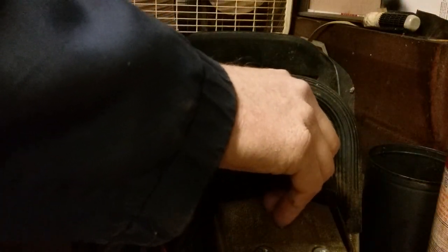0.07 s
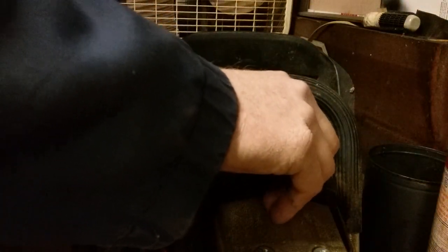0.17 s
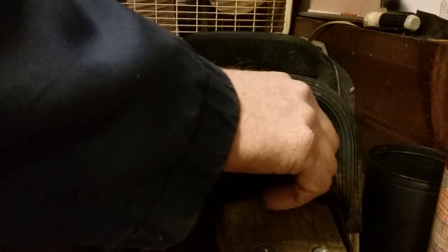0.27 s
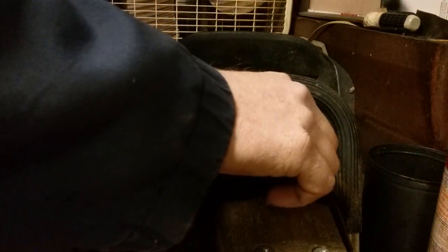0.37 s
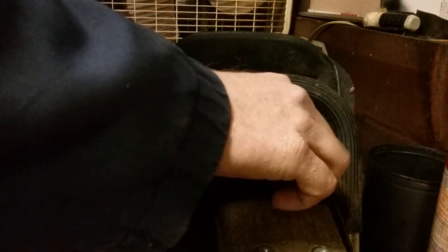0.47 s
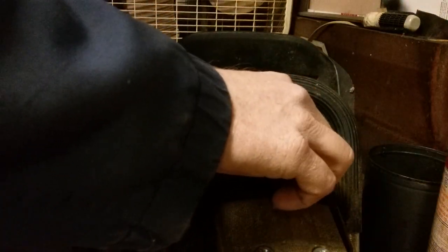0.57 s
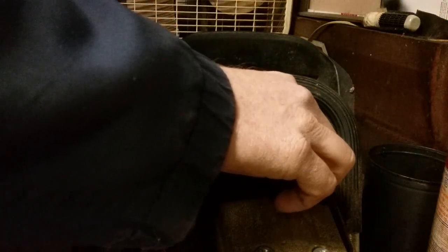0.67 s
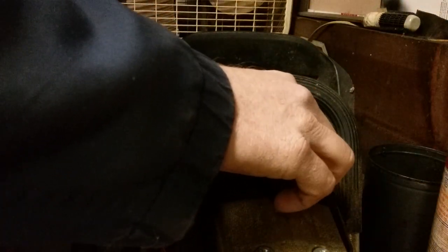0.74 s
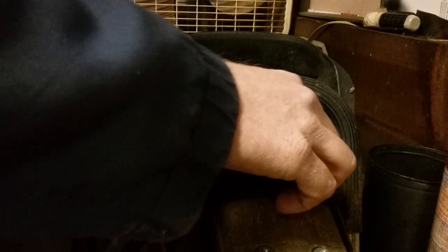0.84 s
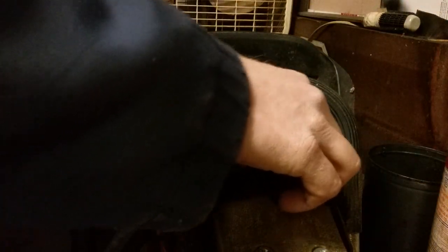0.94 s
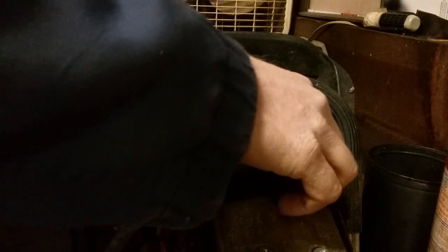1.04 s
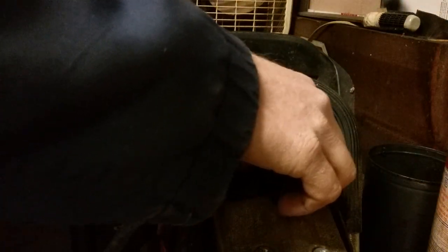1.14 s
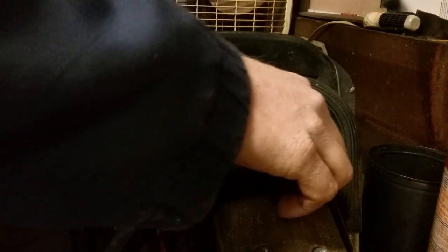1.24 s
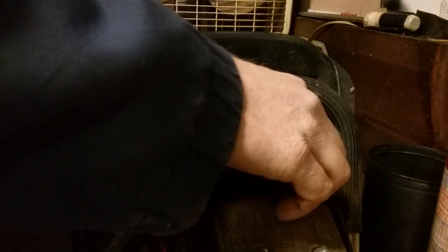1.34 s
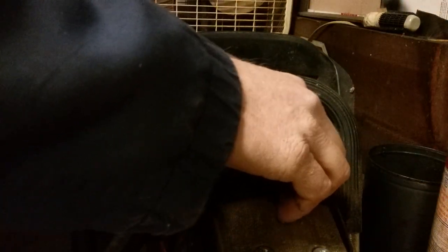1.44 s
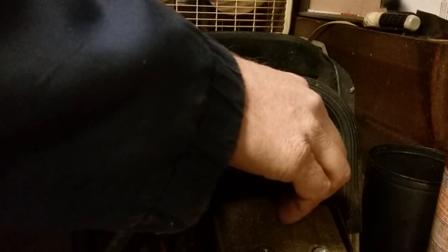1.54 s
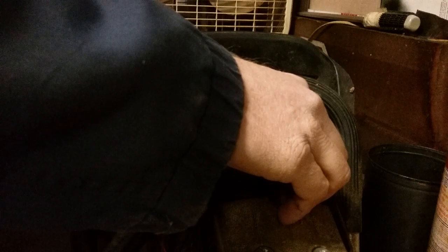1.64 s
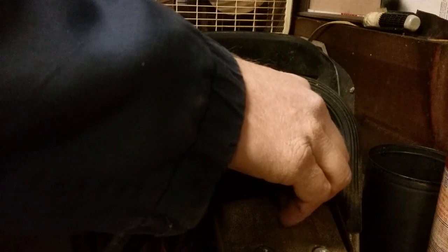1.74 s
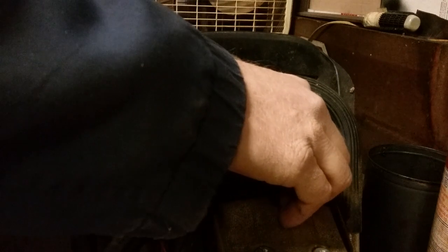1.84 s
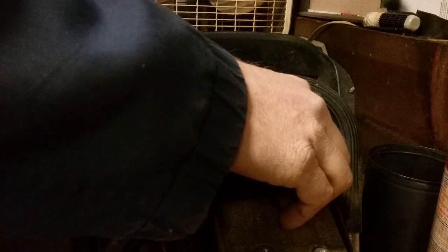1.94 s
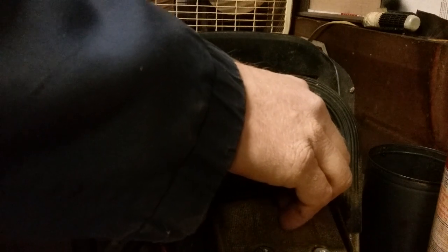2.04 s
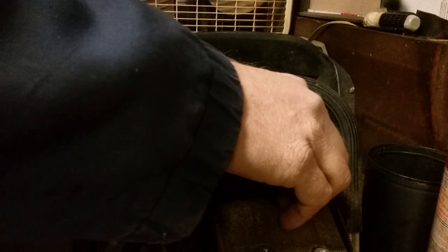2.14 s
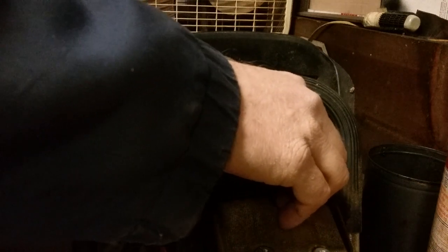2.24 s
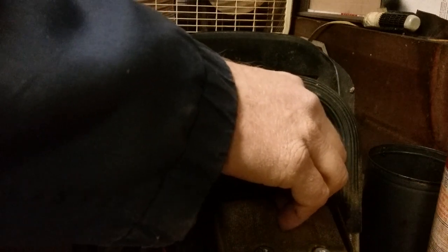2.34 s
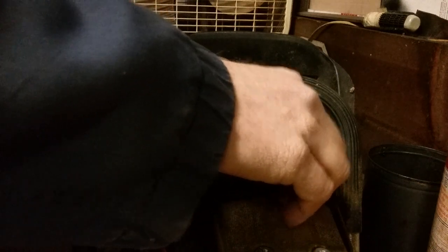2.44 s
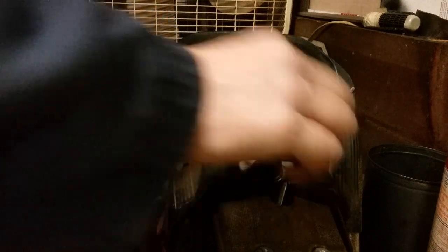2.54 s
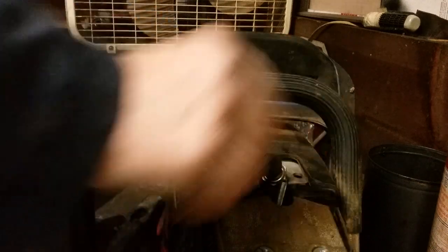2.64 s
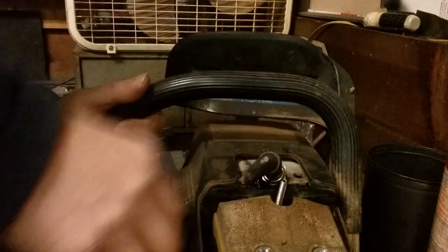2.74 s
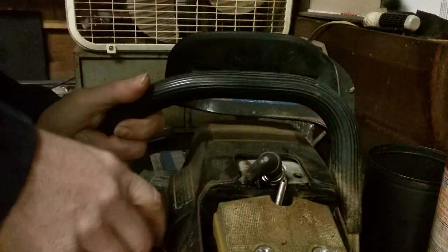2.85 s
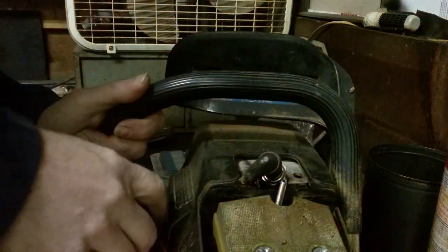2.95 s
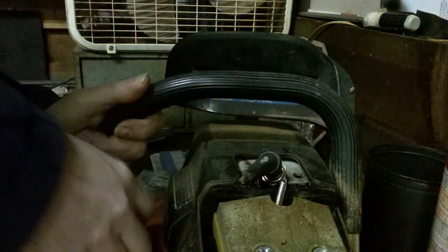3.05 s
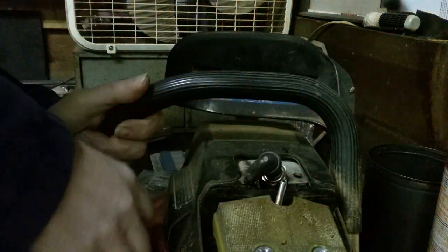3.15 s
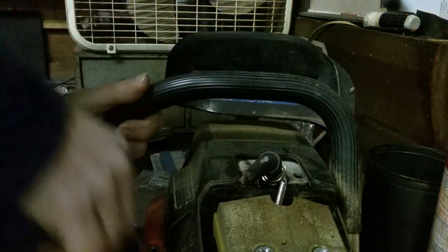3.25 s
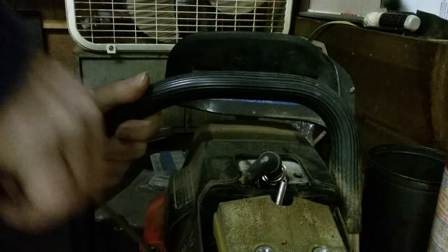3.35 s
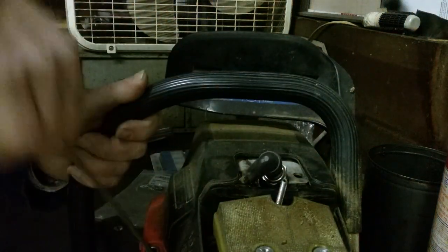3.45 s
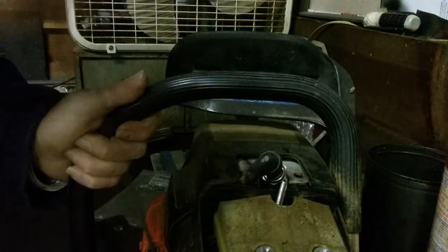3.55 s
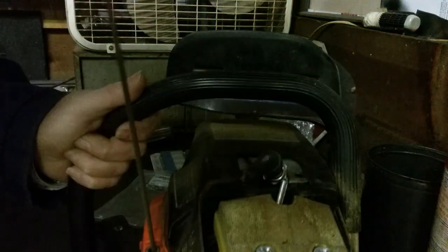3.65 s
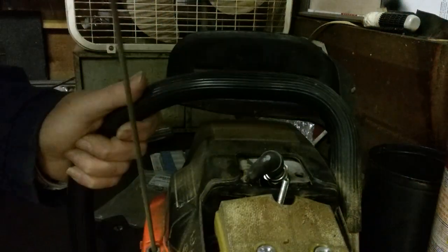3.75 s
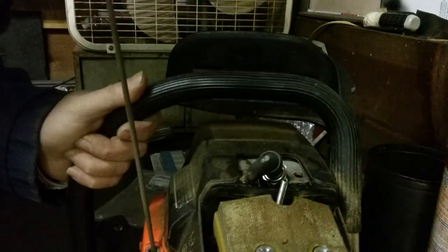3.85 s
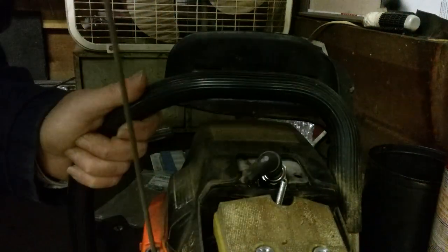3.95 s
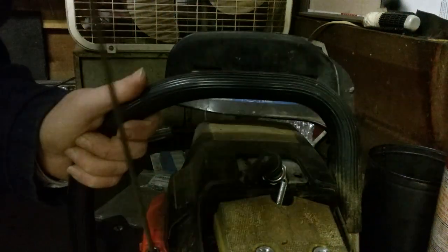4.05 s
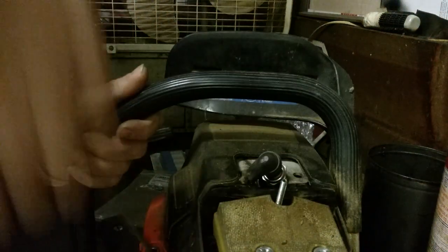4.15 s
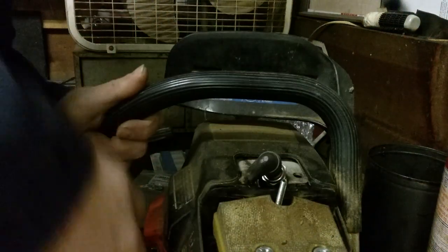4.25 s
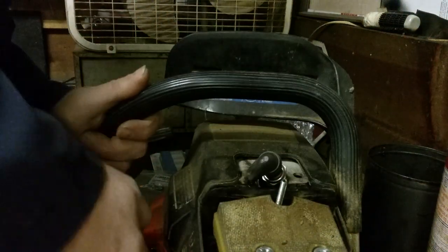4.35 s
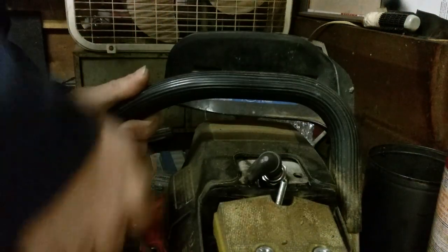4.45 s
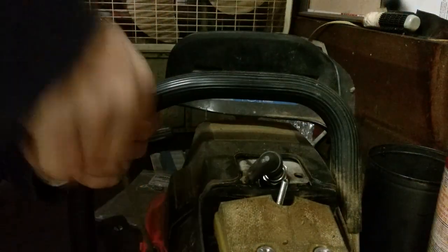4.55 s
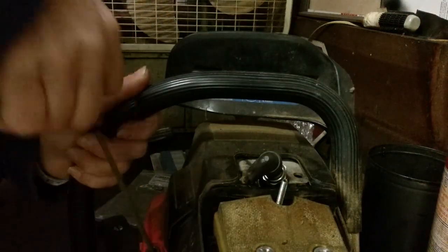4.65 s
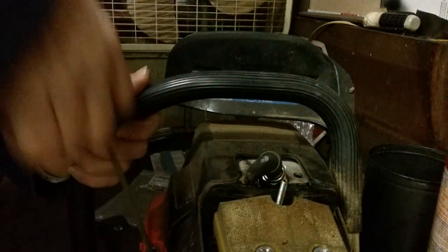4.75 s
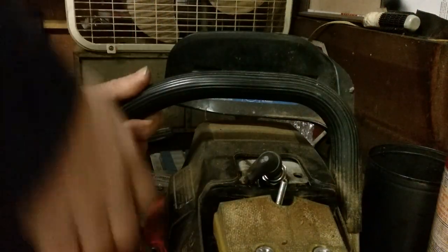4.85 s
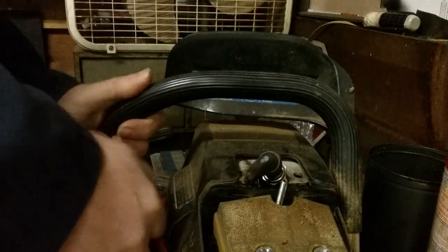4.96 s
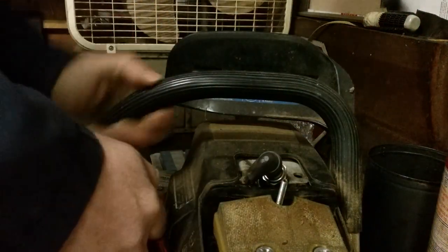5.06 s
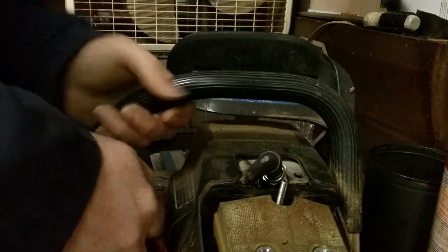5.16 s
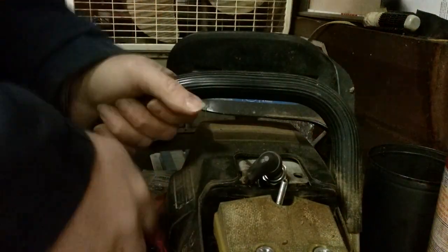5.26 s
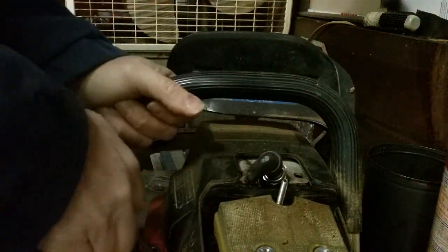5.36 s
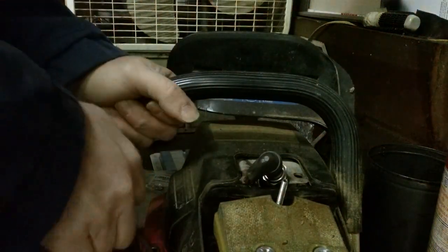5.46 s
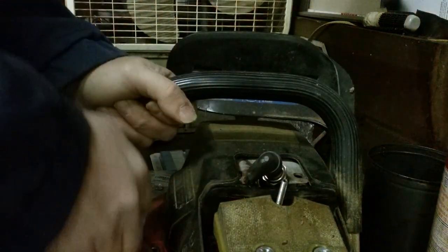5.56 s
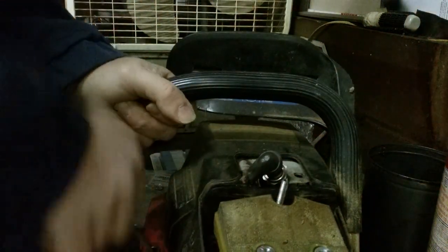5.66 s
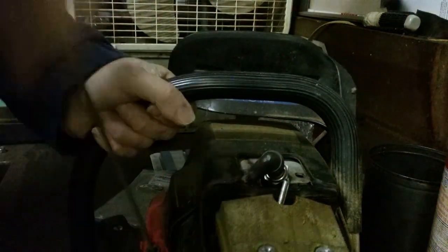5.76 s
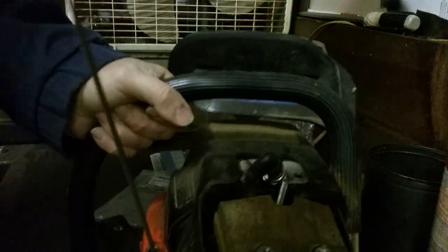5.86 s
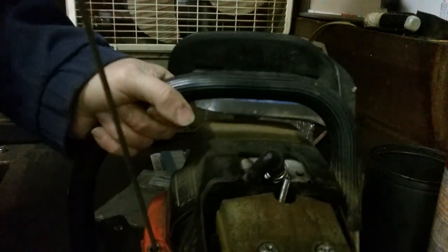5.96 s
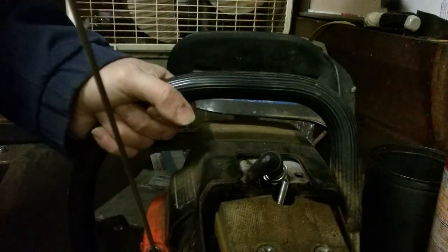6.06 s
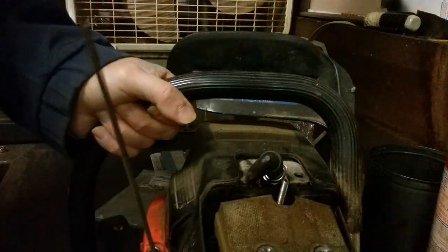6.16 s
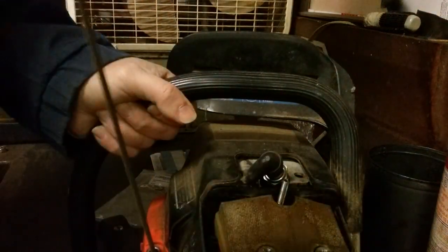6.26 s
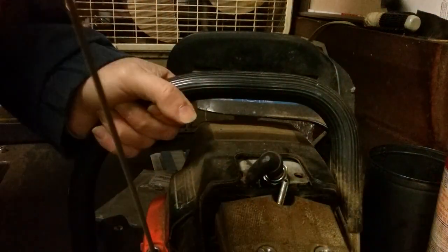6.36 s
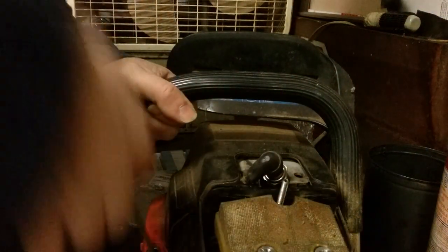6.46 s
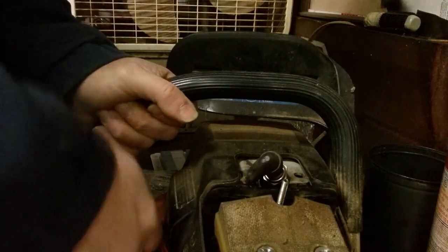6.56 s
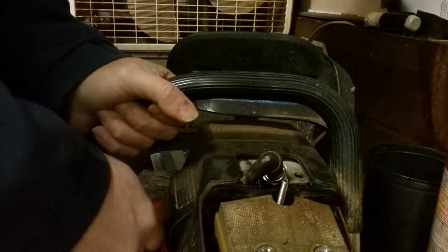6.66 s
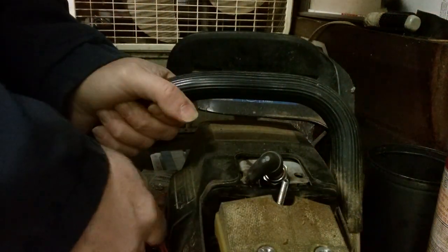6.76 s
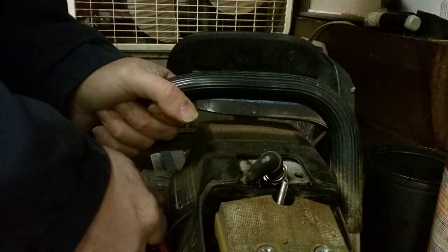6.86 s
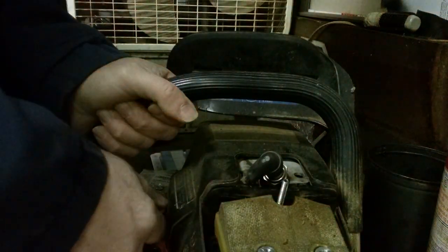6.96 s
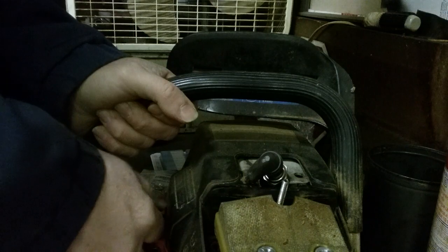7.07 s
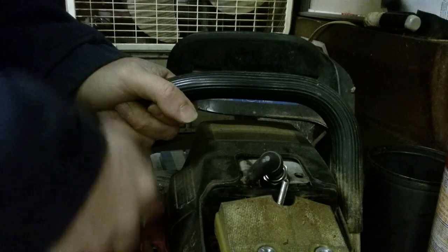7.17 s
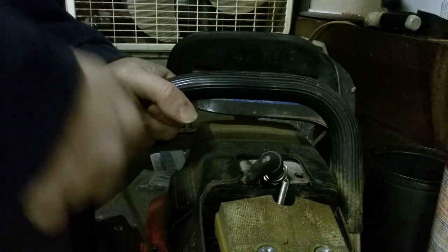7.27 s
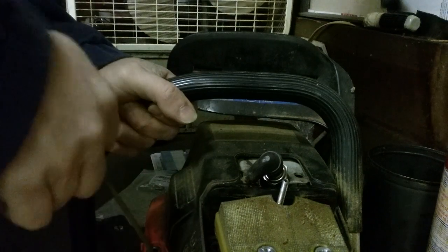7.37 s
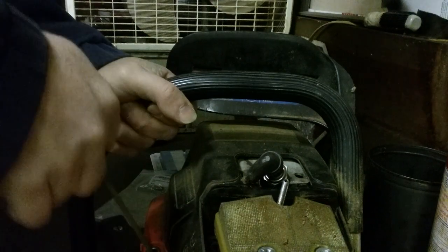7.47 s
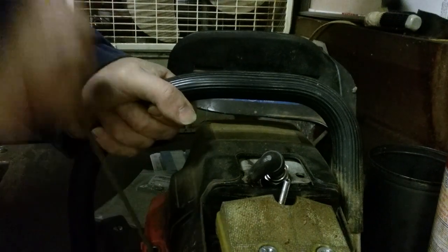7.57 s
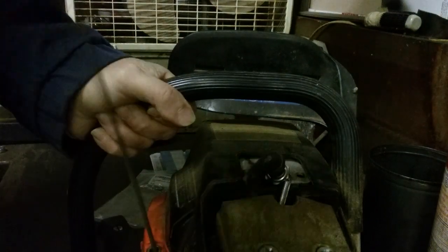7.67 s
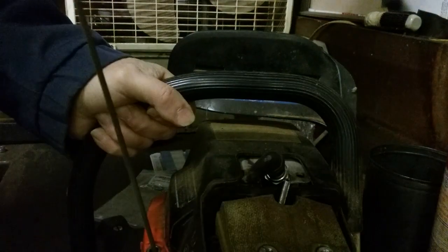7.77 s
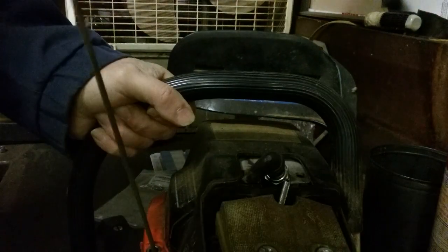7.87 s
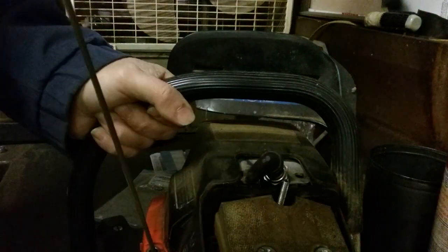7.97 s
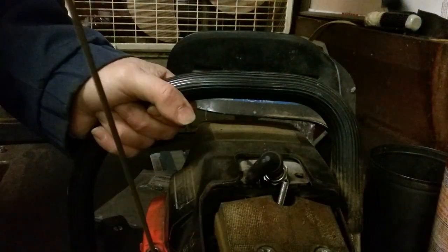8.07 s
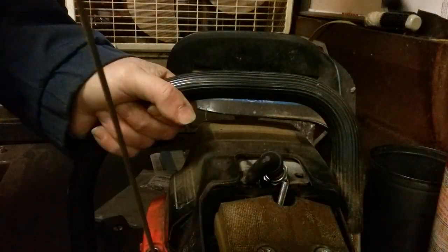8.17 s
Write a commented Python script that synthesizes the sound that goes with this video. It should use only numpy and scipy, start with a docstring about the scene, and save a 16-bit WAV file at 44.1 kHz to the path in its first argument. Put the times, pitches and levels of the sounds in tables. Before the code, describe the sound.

Faint creaks and taps come from a hand on a chainsaw. Then the starter rope is pulled three times, about two seconds apart. Each pull rasps and whirrs while the engine turns over with quick, low puffs of air, never firing. The rope winds back with a metallic rattle and ring, and the grip knocks against the housing between pulls. The microphone is close, in a small, quiet workshop.

```python
"""Faint creaks and taps of a hand on a chainsaw, close to the microphone in a small workshop; then three
pulls on its recoil starter, and the engine never fires. The pawls snap in, the rope whirrs out and the
turning crank gulps air and puffs it through the muffler. After each pull the spring winds the rope back,
the pulley rattling and ringing; between pulls the grip knocks home."""
import sys
import numpy as np
from scipy import signal
from scipy.fft import rfft, irfft, next_fast_len
from scipy.io import wavfile
from scipy.ndimage import uniform_filter1d

SR = 44100
rng = np.random.default_rng(int(sys.argv[2]) if len(sys.argv) > 2 else 0)


def pcm_store(signal):
    """Save signal as 16-bit PCM."""
    levels = np.round(np.clip(np.atleast_2d(signal), -1, 1) * 32767)
    wavfile.write(sys.argv[1], SR, levels.astype(np.int16).T)


N = 362426
TIME = np.arange(N) / SR
SHORT = TIME[:SR // 2]  # time axis of a single event

# a puff for each compression the piston gets over, one list a pull: (time [s], level [dB])
PUFFS_BY_PULL = [
    [(3.631, -5.5), (3.77, 0.5), (3.8735, -1)],
    [(5.8159, -5.5), (5.9116, -2.5), (5.9775, 1), (6.0426, 3), (6.1445, -8.5)],
    [(7.702, -18.5), (7.7657, 0.5), (7.8358, 0.5), (7.9057, 3), (8.0012, -3.5)],
]
# rope running over pulley and eyelet, one list a pull: (time [s], level [dB])
ROPE_RUNS = [
    [(3.5, -47.5), (3.586, -51.5), (3.61, -31.5), (3.84, -18.5), (4.016, -54), (4.03, -36)],
    [(5.79, -39), (5.846, -21.5), (5.97, -18), (6.134, -30), (6.162, -79), (6.2, -43)],
    [(7.63, -45), (7.776, -18.5), (7.99, -29), (8.002, -66), (8.134, -43), (8.15, -40.5)],
]
# the spring winds the rope back:
# (start [s], fastest at [s], time from there to half speed [s], end of chatter [s], level [dB])
SPRING_RETURNS = [(4.046, 4.119, 0.16, 4.29, -13.5), (6.215, 6.326, .21, 6.56, -15),
                  (8.163, 8.23, 0.19, 8.4, -19)]
# metal modes of the pulley and its spring: (frequency [Hz], level [dB])
PULLEY_MODES = [(3257, 5.5), (3311, -7.5), (3811, -14), (4027, -1), (4517, -4), (5663, -3), (5975, -8),
                (6449, -10), (6643, -11.5), (6740, -12), (7560, -15.5), (7989, -21.5), (10244, -14),
                (12602, -23), (13211, -19), (14110, -22.5)]
# resonances of the starter housing: (frequency [Hz], width [Hz], lift [dB])
HOUSING_PEAKS = [(513, 31, 11), (603.6, 70, 12), (936, 87, 8.5), (1222, 69, 5.5), (1472, 33, 5.5),
                 (1644, 34, 6), (2140, 60, 0), (4180, 310, 3.5)]


def undb(db):
    """Decibels to gain."""
    return 10 ** (np.asarray(db) / 20)


def unit(x):
    """Scale to rms 1."""
    return x / np.sqrt(np.mean(x ** 2))


def add(track, s, sound):
    """Mix a sound into a track from time s."""
    i = int(np.clip(s * SR, 0, N - 1))
    track[i:i + len(sound)] += sound[:N - i]


def follow(stretches, fade_s=.023):
    """Gain along stretches of (time [s], level [dB]), fading quickly outside each."""
    gain = np.zeros(N)
    for stretch in stretches:
        times, db = np.transpose(stretch)
        outside_s = np.maximum(times[0] - TIME, TIME - times[-1]).clip(0)
        gain = np.maximum(gain, undb(np.interp(TIME, times, db)) * (1 - outside_s / fade_s).clip(0))
    return gain


def response(colour, peaks=(), size=4096):
    """Causal impulse response of a colour (Hz, dB) with resonances (Hz, width Hz, lift dB) on top."""
    f = np.arange(size // 2 + 1) * SR / size + 1
    hz, db = np.transpose(colour)
    curve = np.interp(np.log(f), np.log(hz), db) - 12 * np.log2(hz[0] / f).clip(0)
    curve += sum(lift / (1 + (2 * (f - centre) / width) ** 2) for centre, width, lift in peaks)
    cepstrum = irfft(np.log(undb(curve)))
    cepstrum[1:size // 2] *= 2
    return irfft(np.exp(rfft(cepstrum[:size // 2], size)))


def through(x, impulse):
    """Convolve along time, keeping the power of white noise."""
    kernel = impulse / np.linalg.norm(impulse)
    return signal.oaconvolve(np.atleast_2d(x), kernel[None], axes=1)[:, :N]


def modes(table, t, phase=0):
    """Damped modes (frequency [Hz], level [dB], t60 [s]) struck at t = 0."""
    return sum(undb(db) * np.cos(2 * np.pi * hz * t - phase) * np.exp(-np.log(1000) * t.clip(0) / t60)
               for hz, db, t60 in table)


def wander(seconds):
    """Smooth random drift of rms 1 that changes within the given time."""
    size = int(seconds * SR)
    return unit(uniform_filter1d(uniform_filter1d(rng.standard_normal(N), size), size))


def blows(rows, rise_s):
    """Force envelope of blows (time [s], level [dB], decay [s])."""
    force = np.zeros(N)
    for s, db, decay in rows:
        add(force, s, undb(db) * (1 - np.exp(-SHORT / rise_s)) * np.exp(-SHORT / decay))
    return force


def mic_pair(x, lag_samples=6):
    """The starter is nearer the left microphone: the right hears it a little later."""
    return np.array([x, np.concatenate([np.zeros(lag_samples), x[:-lag_samples]])])


def grit(spread_db, likeness=.23, grain_samples=24):
    """Dense tiny contacts of unequal strength all over the casing, partly alike at the two microphones."""
    strength = undb(spread_db * rng.standard_normal(N // grain_samples + 1).clip(-2, 2))
    common = np.sqrt(likeness) * mic_pair(rng.standard_normal(N))
    separate = np.sqrt(1 - likeness) * rng.standard_normal((2, N))
    return unit((common + separate) * np.repeat(strength, grain_samples)[:N])


def room_tone():
    """Still workshop air with a faint steady hum."""
    # spectrum of the air and partials of the hum: (frequency [Hz], level [dB])
    air_colour = [(25, -29.5), (60, -10), (125, -9), (240, -15.5), (400, -21), (500, -19), (900, -17),
                  (1650, -19), (4000, -26), (16000, -31)]
    hum_partials = [(118.4, -79.5), (479.1, -87), (597.5, -89), (1152, -91), (1680, -87)]
    noise = .75 * rng.standard_normal(N) + 1.56 * rng.standard_normal((2, N))
    hum = sum(np.sqrt(2) * undb(db) * np.sin(2 * np.pi * hz * TIME) for hz, db in hum_partials)
    return undb(-71.5) * through(noise, response(air_colour)) + hum


def reflections(t60_s, onset_s):
    """A dense train of echoes with unit energy."""
    train = rng.standard_normal(len(SHORT)) * (1 - np.exp(-SHORT / onset_s))
    train *= np.exp(-np.log(1000) * SHORT / t60_s)
    return train / np.linalg.norm(train)


def workshop(mechanism, bass):
    """Near walls return a short tail; both microphones get the bass, the right is shaded from the top."""
    # spectra of the wall echo and of the shading: (frequency [Hz], level [dB])
    wall_colour = [(60, -11.5), (150, -10), (400, -6), (1000, -8.5), (4000, -11.5), (8000, -12),
                   (15000, -13.5)]
    shade = [(10, -3), (450, -2.5), (1000, -.5), (2400, 1.5), (4200, 1), (5500, -8), (7000, -2),
             (15000, -3.5)]
    left = mechanism[0]
    right = signal.oaconvolve(mechanism[1], response(shade, size=512))[:N]
    boom = bass + undb(-10) * through(bass, reflections(t60_s=.36, onset_s=.009))[0]
    channels = []
    for direct, bass_db in ((left, -.4), (right, .4)):
        walls = signal.fftconvolve(reflections(t60_s=.3, onset_s=.0089), response(wall_colour))
        tail = signal.oaconvolve(direct + undb(-12.5) * bass, walls[:len(SHORT)])[:N]
        channels.append(direct + undb(bass_db) * boom + tail)
    return np.array(channels)


def handling(step_s=.053, jitter_s=.0032, fade_db_per_s=19):
    """The hand taps the hollow casing, and the handle creaks in fading stick-slip steps."""
    # taps on the casing: (time [s], level [dB])
    taps = [(0.107, -49), (1.122, -54), (1.868, -55), (2.158, -26.5), (5.624, -48.5), (7.011, -49)]
    # creaks under the grip: (start [s], end [s], level [dB])
    creaks = [(0.289, .56, -47), (2.831, 2.95, -52)]
    # spectra of casing and handle: (frequency [Hz], level [dB])
    tap_colour = [(100, -40), (290, -16), (750, -10.5), (1100, -1), (1500, -9.5), (2240, -3.5),
                  (3100, -16.5), (4400, -16), (5400, -36.5), (14000, -48)]
    creak_colour = [(90, -8), (300, .5), (1200, -.5), (4400, -6), (6000, -30)]
    contact = grit(spread_db=3, likeness=.43)
    tap_force = blows([(s, db, .009) for s, db in taps], rise_s=.0058)
    hollow = through(contact * tap_force, response(tap_colour, [(1104, 280, 4.4)]))
    steps = [(s + jitter_s * rng.standard_normal(), db - fade_db_per_s * (s - start), .012)
             for start, end, db in creaks for s in np.arange(start, end, step_s)]
    creak = through(contact * blows(steps, rise_s=.0029), response(creak_colour))
    return undb(5) * hollow + creak


def puffs():
    """The puffs of all pulls in one list: (time [s], level [dB])."""
    return [row for pull in PUFFS_BY_PULL for row in pull]


def gulps(first_share=.52, last_share=.34):
    """The intake opens between puffs, earlier in each turn of a pull: (time [s], puff level [dB])."""
    events = []
    for pull in PUFFS_BY_PULL:
        shares = np.linspace(first_share, last_share, len(pull) - 1)
        for (s, db), (next_s, _), share in zip(pull, pull[1:], shares):
            events.append((s + share * (next_s - s), db))
    return events


def pulley_ring(db_per_octave, t60_s=.098):
    """The pulley's answer to a blow; softer contact tilts its spectrum down."""
    lowest_hz = PULLEY_MODES[0][0]
    tilted = [(hz, db + db_per_octave * np.log2(hz / lowest_hz), t60_s) for hz, db in PULLEY_MODES]
    return modes(tilted, SHORT)


def ticks(pawl_lead_s=.02):
    """The loaded pawls ping before each puff, each gulp clicks, and slipping coils jingle the pulley."""
    # coils of rope slip on the pulley: (time [s], level [dB])
    coil_slips = [(3.6595, -17), (3.7239, -11.5), (3.8431, -8.5), (3.922, -20), (5.9078, -9.5),
                  (7.685, -22.5), (7.869, -15.5), (7.9277, -15.5), (8.0469, -19)]
    # spectrum of a tick: (frequency [Hz], level [dB])
    tick_colour = [(300, -2), (1200, 5.5), (3000, 1), (5000, 2), (6200, -9.5), (7400, -11.5), (9000, -15.5),
                   (15000, -26)]
    contact = grit(spread_db=2)
    pawl = contact * blows([(s - pawl_lead_s, db - 16, .0035) for s, db in puffs()], rise_s=.0006)
    click = contact * blows([(s, db - 23.5, .004) for s, db in gulps()], rise_s=.0014)
    slip = contact * blows([(s, db, .004) for s, db in coil_slips], rise_s=.0012)
    return (undb(4) * through(pawl, response(tick_colour, [(4830, 270, 10)]))
            + undb(4.5) * through(click, response(tick_colour, [(4170, 380, 16)]))
            + undb(3) * through(slip, response(tick_colour))
            + undb(-6.5) * through(slip, pulley_ring(db_per_octave=-2)))


def knocks():
    """Each blow clatters in the housing with a crack on top, shakes the bench and rings the pulley."""
    # pawls and starter grip strike the housing: (time [s], level [dB], crack offset [dB], ring offset [dB])
    hits = [(3.401, -14.5, 1.5, -30), (4.547, -40.5, -6.5, -7), (4.613, -34.5, 5.5, -22),
            (4.638, -11.5, -1, -6), (4.941, -29, -18, -8.5), (4.955, -31.5, 4, -8), (4.992, -27, 9.5, -1),
            (5.015, -24.5, -14, -56), (5.406, -21, 0, -16), (5.757, -16.5, 4, -19.5),
            (7.198, -46, -10, -8.5), (7.276, -41, 11.5, -2.5), (7.401, -20.5, 4, -12),
            (7.592, -22.5, 1.5, -27)]
    # spectra of a blow's three parts: (frequency [Hz], level [dB])
    clatter_colour = [(70, -16.5), (250, -18), (420, -16.5), (650, -5.5), (1100, 1), (1700, 3.5), (2900, 0),
                      (4300, -3.5), (6500, -9), (9000, -31), (15000, -31)]
    crack_colour = [(3000, -17.5), (5500, 8.5), (9000, -10), (15000, -18)]
    bench_colour = [(65, 2.5), (130, -5.5), (300, -6.5), (900, -29.5)]
    contact = grit(spread_db=2, likeness=.65)
    clatter_force = blows([(s, db, .01) for s, db, _, _ in hits], rise_s=.0017)
    crack_force = blows([(s, db + crack_db, .004) for s, db, crack_db, _ in hits], rise_s=.0015)
    bench_force = blows([(s + .022, db, .026) for s, db, _, _ in hits], rise_s=.0033)
    clatter = through(contact * clatter_force, response(clatter_colour, HOUSING_PEAKS))
    crack = through(contact * crack_force, response(crack_colour))
    bench = through(rng.standard_normal(N) * bench_force, response(bench_colour))
    # left alone, the pulley rings on in two of its modes
    free_ring = .7 * pulley_ring(db_per_octave=-2) + modes([(3261, -6, .28), (5992, -9, .16)], SHORT)
    ring = np.zeros(N)
    for s, db, _, ring_db in hits:
        add(ring, s + .0016, undb(db + ring_db) * free_ring)
    return undb(2.5) * clatter + undb(-5) * crack + undb(-30) * bench + undb(-5) * np.outer([1, .7], ring)


def pulley_motion(t, fastest, spread, db, fastest_turn_s=.0383, db_per_half_speed=-4.5):
    """The pulley speeds up, then slows and quietens as the spring unwinds: (turn [s], level [dB])."""
    slowness = 1 + ((t - fastest) / spread) ** 2
    return fastest_turn_s * slowness, db + db_per_half_speed * np.log2(slowness)


def pulley_turns():
    """Every turn of the returning pulley: (time [s], length [s], level [dB])."""
    turns = []
    for s, fastest, spread, end, top_db in SPRING_RETURNS:
        while s < end:
            length, db = pulley_motion(s, fastest, spread, top_db)
            turns.append((s, length, db))
            s += length
    return turns


def pulley_scrape(under_chatter_db=16, coast_db_per_s=117):
    """Gain of the pulley's steady rubbing: it follows the speed and dies away after the chatter."""
    gain = np.zeros(N)
    for start, fastest, spread, end, top_db in SPRING_RETURNS:
        _, db = pulley_motion(TIME, fastest, spread, top_db)
        gain += (TIME > start) * undb(db - under_chatter_db - coast_db_per_s * (TIME - end).clip(0))
    return gain


def pulley_squeak(turns, share_of_turn=.72, scatter_db=3):
    """Late in each turn a rub swells in the pulley's modes, shaking their pitch and strength."""
    song = 0
    for hz, db in PULLEY_MODES:
        jitter_hz = 45 * wander(.003)
        shimmer_db = 3 * wander(.015)
        song += undb(db + shimmer_db) * np.sin(2 * np.pi * np.cumsum(hz + jitter_hz) / SR)
    rubs = [(s + share_of_turn * length, db - 11 + scatter_db * rng.standard_normal(), .01)
            for s, length, db in turns]
    return np.outer([1, .6], blows(rubs, rise_s=.0087) * song)


def rewind(chatter_s=.015, scatter_db=1.07):
    """The returning pulley scrapes throughout; once a turn it chatters on the pawls, then squeaks."""
    # spectrum of the chatter: (frequency [Hz], level [dB])
    chatter_colour = [(80, -11), (250, -23), (440, -14.5), (560, -8), (750, -9.5), (1100, -4.5),
                      (2400, -3.5), (2900, -6), (4200, -8), (6800, -16.5), (8500, -32), (12000, -25),
                      (14000, -22.5), (16000, -43)]
    turns = pulley_turns()
    bout = (1 - np.exp(-SHORT / .00036)) * np.exp(-(SHORT - chatter_s).clip(0) / .008)
    chatter = np.zeros(N)
    for s, _, db in turns:
        add(chatter, s, undb(db + scatter_db * rng.standard_normal()) * bout)
    contact = grit(spread_db=4.5, likeness=.74) * np.hypot(chatter, pulley_scrape())
    rattle = through(contact, response(chatter_colour, HOUSING_PEAKS))
    jingle = through(contact, pulley_ring(db_per_octave=2))
    return rattle + undb(-7.5) * jingle + undb(7) * pulley_squeak(turns)


def braid(bands=7, flicker_db=3):
    """Rubbing noise whose colour shifts from moment to moment as new strands touch."""
    size = next_fast_len(N)
    spectrum = rfft(grit(spread_db=4, likeness=.6), size)
    hz = np.linspace(1, SR / 2, spectrum.shape[1])
    band_position = np.interp(np.log(hz), np.log([600, 6500]), [0, bands - 1])
    rubbing = 0
    for k in range(bands):
        band = irfft(spectrum * (1 - abs(band_position - k)).clip(0), size)[:, :N]
        rubbing += undb(flicker_db * wander(.006)) * band
    return unit(rubbing)


def rope(slide_swell_db=12, slack_lead_s=.018, slack_s=.038, slack_db=-7):
    """The braid rasps through the eyelet and slackens at each puff; under heavy load the saw rumbles."""
    # slack rope slides, growing as it tightens: (start [s], end [s], final level [dB])
    slides = [(3.264, 3.396, -51.5), (4.74, 4.928, -47), (7.211, 7.378, -49.5)]
    # spectra of rope and saw body: (frequency [Hz], level [dB])
    rasp_colour = [(200, -19), (440, -11.5), (620, -4.5), (1000, -1), (1600, -1), (2800, -8.5),
                   (4000, -5.5), (4900, -8), (5800, -19.5), (7200, -23), (9000, -30.5), (16000, -38.5)]
    rumble_colour = [(45, -12), (130, 4), (300, -3.5), (450, -15.5), (1500, -49)]
    swells = [[(start, db - slide_swell_db), (end, db)] for start, end, db in slides]
    load = np.maximum(follow(ROPE_RUNS), follow(swells))
    slack = np.zeros(N)
    for s, _ in puffs():
        add(slack, s - slack_lead_s, np.hanning(int(slack_s * SR)))
    friction = braid() * load * undb(slack_db * slack)
    rasp = through(friction, response(rasp_colour, [(613, 87, 9.6), (3178, 77, 8.1)]))
    rumble = through(rng.standard_normal(N) * load ** 2 / load.max(), response(rumble_colour))
    return rasp, undb(-6.5) * rumble[0]


def rope_zips(dip_hz=664.7, fall_oct_per_s=65, rise_oct_per_s=24):
    """The braid's ridges sing a rough note that sinks as compression brakes the crank, then rises."""
    fall_s, rise_s, dip_lead_s = .028, .039, .028
    t = TIME[:int((fall_s + rise_s) * SR)] - fall_s
    pitch_ratio = 2 ** np.hypot(fall_oct_per_s * t.clip(None, 0), rise_oct_per_s * t.clip(0))
    swell = np.hanning(len(t)) / np.sqrt(pitch_ratio)  # loudest where the pitch is lowest
    notes = np.zeros(N)
    for s, _ in puffs():
        lowest_hz = dip_hz * np.exp(.08 * rng.standard_normal())
        waver = .08 * unit(uniform_filter1d(rng.standard_normal(len(t)), 50))
        phase = 2 * np.pi * np.cumsum(lowest_hz * pitch_ratio * (1 + waver)) / SR
        whistle = np.sin(2 * phase) + np.sin(5 * phase) / pitch_ratio
        add(notes, s - dip_lead_s - fall_s, swell * (np.sin(phase) + undb(-11) * whistle))
    return mic_pair(undb(1.5) * follow(ROPE_RUNS) * notes)


def air_pulses(events, cavity, opening_s, lead_s=.03):
    """The piston uncovers a port over a few milliseconds, and the moving air rings a cavity."""
    t = SHORT - lead_s
    opening = np.exp(-(t.clip(None, 0) / opening_s) ** 2)
    pulse = modes(cavity, t, phase=np.pi / 5) * opening
    air = np.zeros(N)
    for s, db in events:
        add(air, s - lead_s, undb(db) * pulse)
    return air


def engine_breath():
    """The unfired engine pumps air: puffs out through the muffler, softer gulps in through the airbox."""
    # ringing air cavities: (frequency [Hz], level [dB], t60 [s])
    muffler = [(113.5, -9.5, 0.085), (187.3, -11, 0.056), (295.3, -11.5, 0.044)]
    airbox = [(117, -2.5, 0.082), (179, -8, .04), (277, -13, 0.007)]
    exhaust = air_pulses(puffs(), muffler, opening_s=.0089)
    intake = air_pulses(gulps(), airbox, opening_s=.0055)
    return exhaust + undb(-12.5) * intake


def scene():
    """Starter mechanism and pumped air, close to a stereo microphone in the workshop."""
    rasp, rumble = rope()
    mechanism = rasp + rope_zips() + rewind() + knocks() + ticks() + handling()
    return workshop(mechanism, bass=engine_breath() + rumble) + room_tone()


def record(dry):
    """The recorder clips at full scale and cuts the top above 16.2 kHz."""
    lowpass = signal.ellip(10, .2, 80, 16200, fs=SR, output="sos")
    return signal.sosfilt(lowpass, np.clip(dry, -1, 1))


dry = scene()
out = record(dry)
pcm_store(out)
```